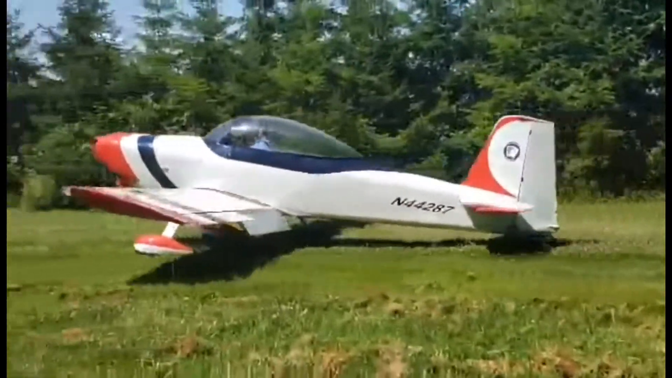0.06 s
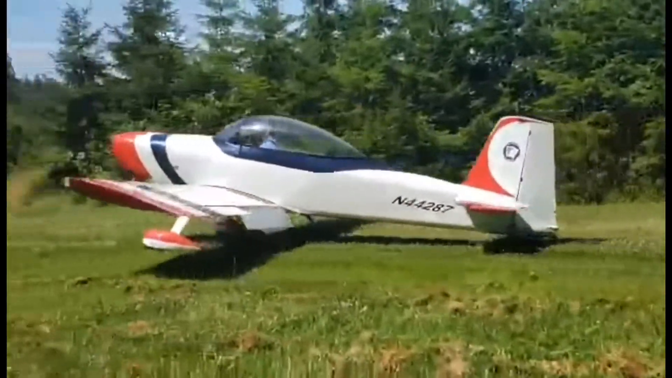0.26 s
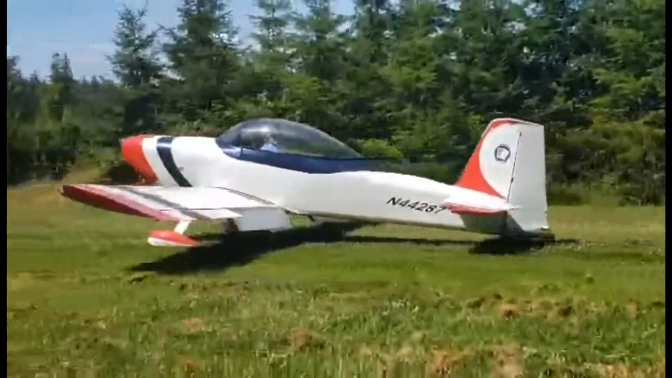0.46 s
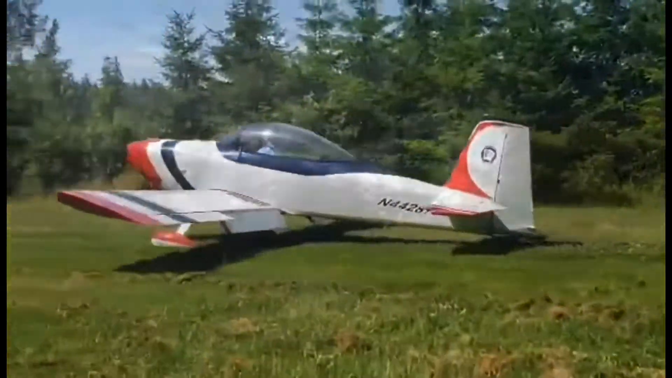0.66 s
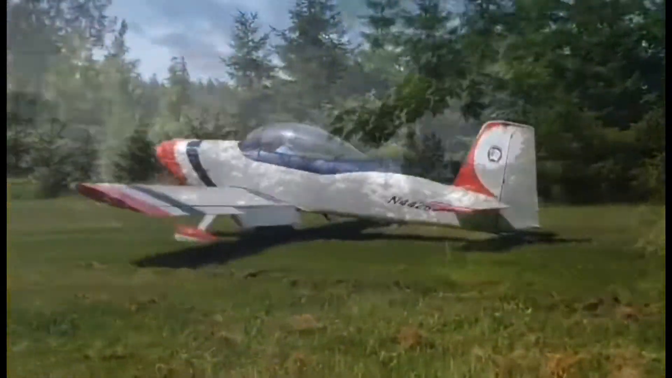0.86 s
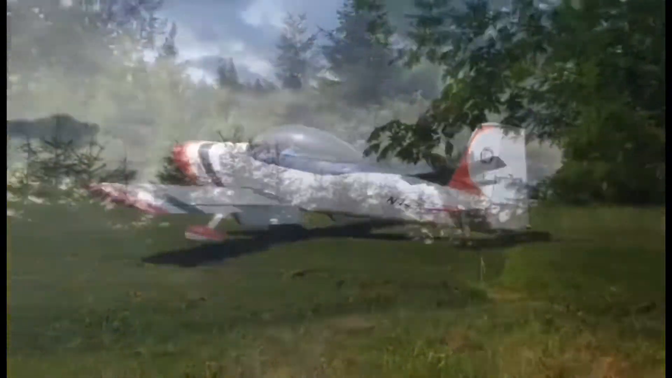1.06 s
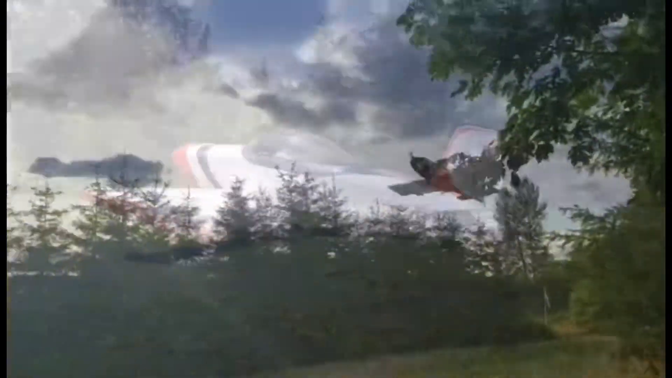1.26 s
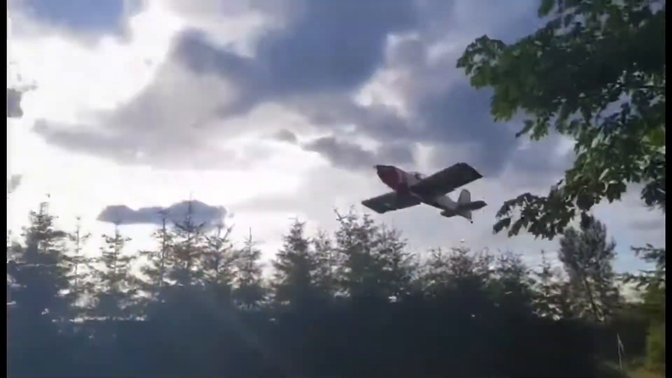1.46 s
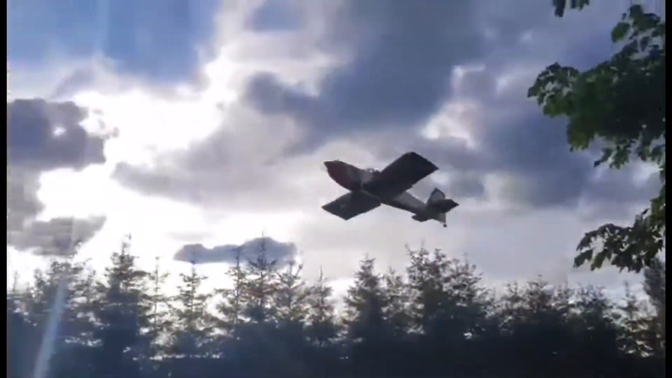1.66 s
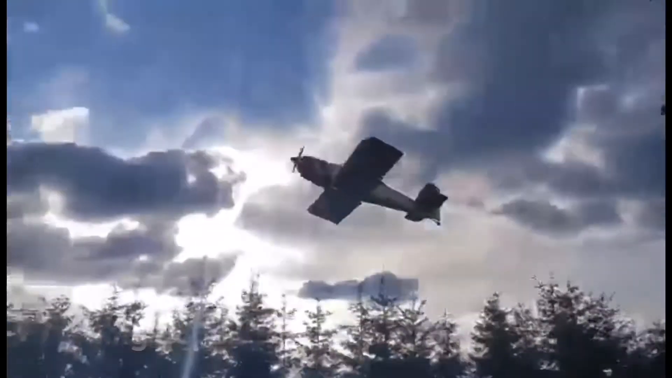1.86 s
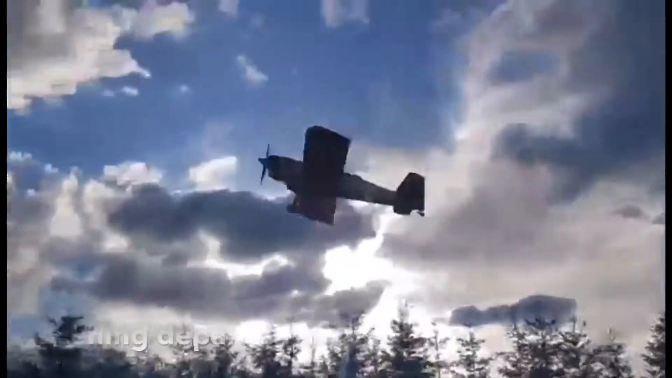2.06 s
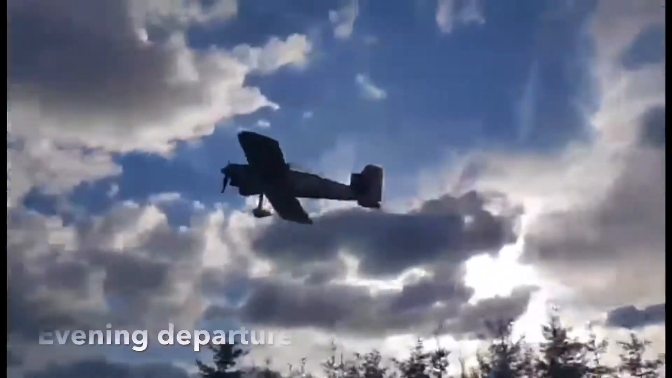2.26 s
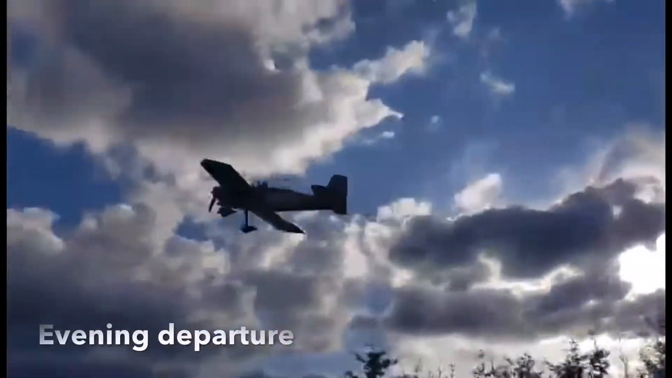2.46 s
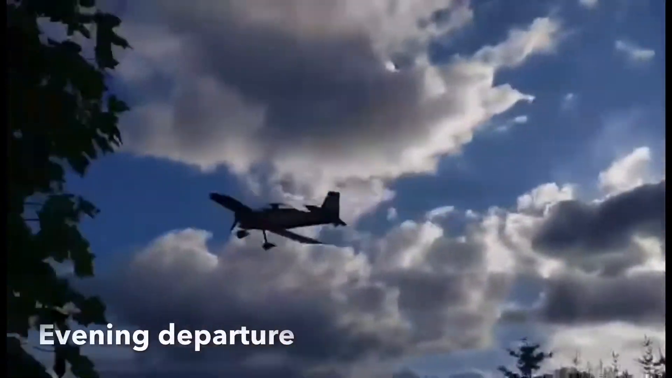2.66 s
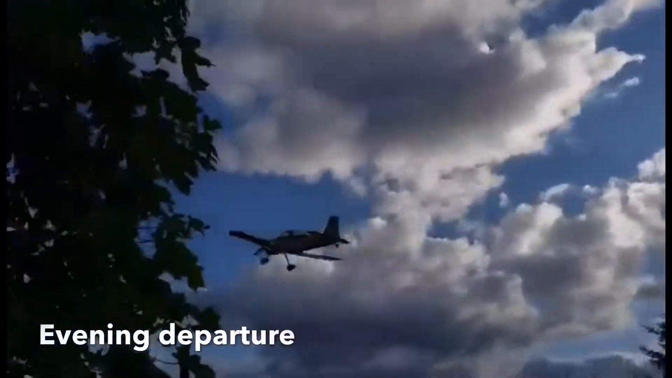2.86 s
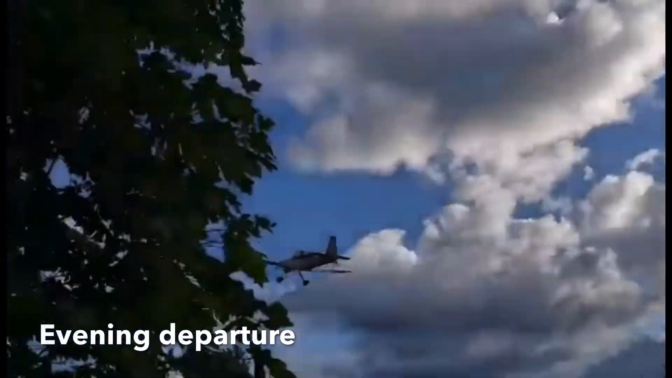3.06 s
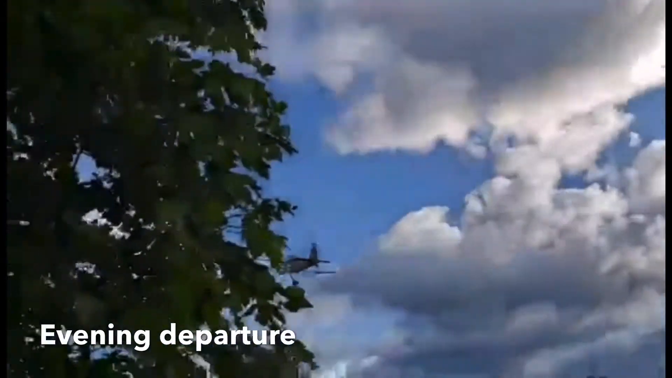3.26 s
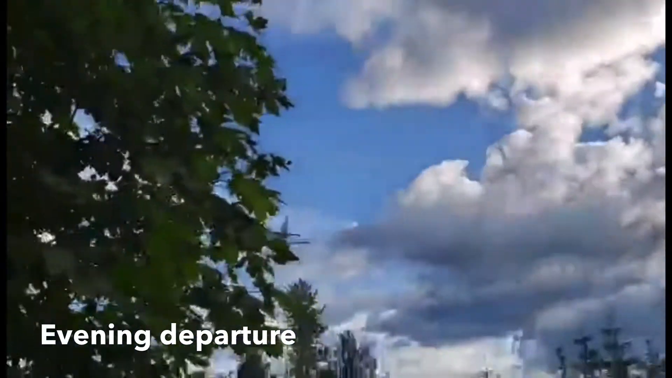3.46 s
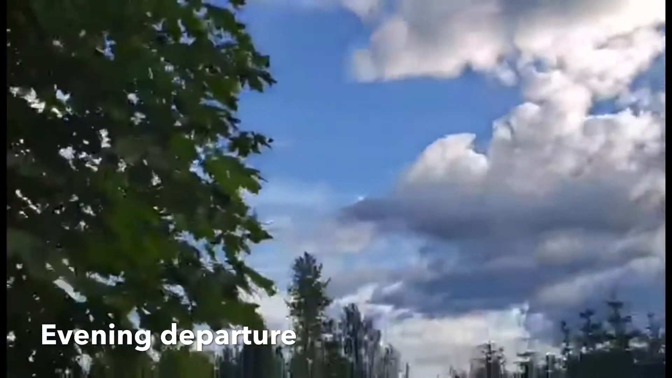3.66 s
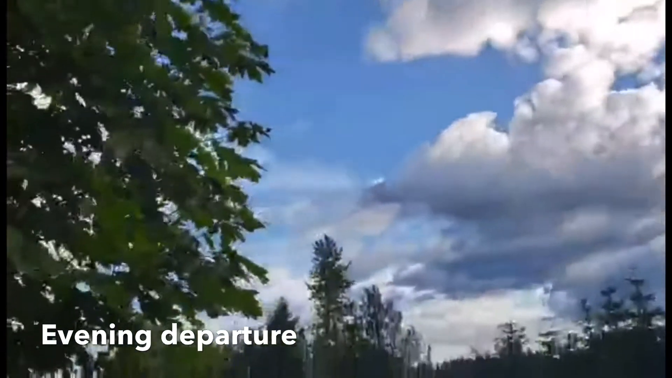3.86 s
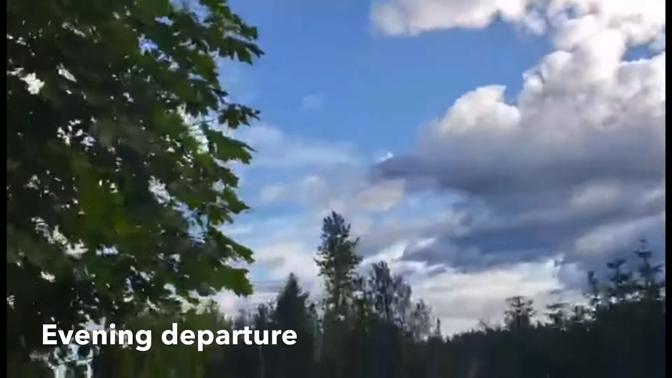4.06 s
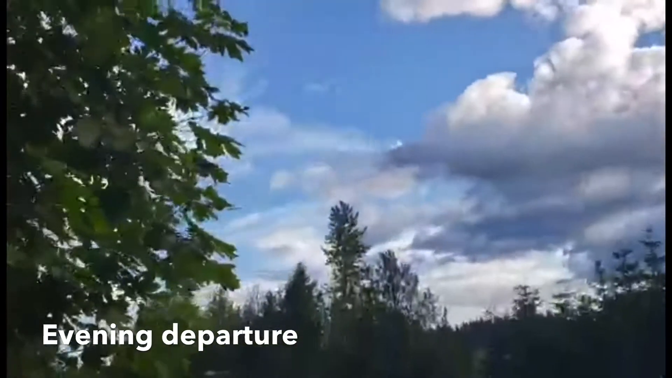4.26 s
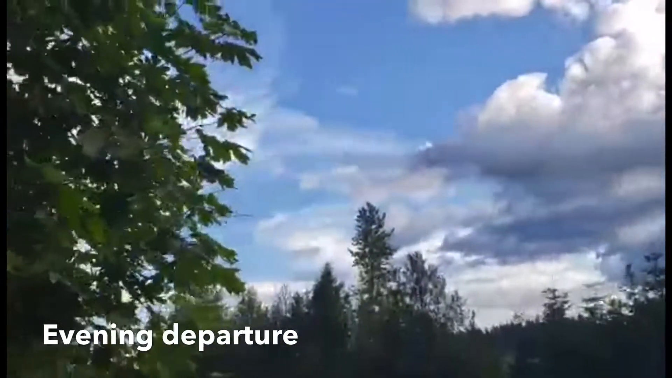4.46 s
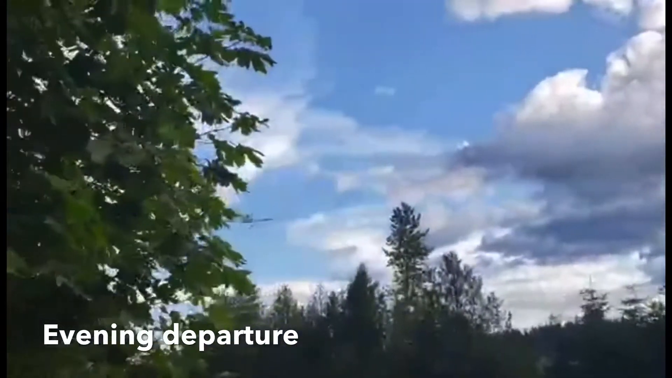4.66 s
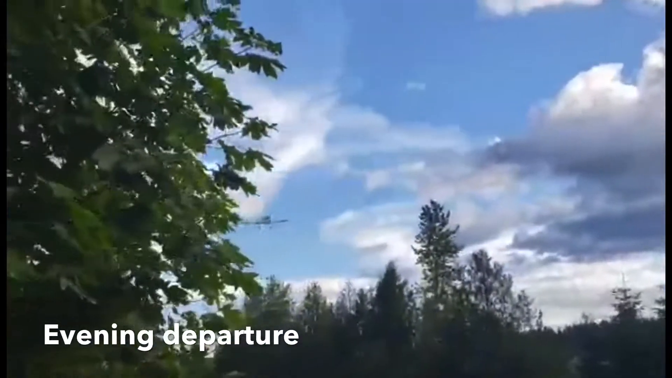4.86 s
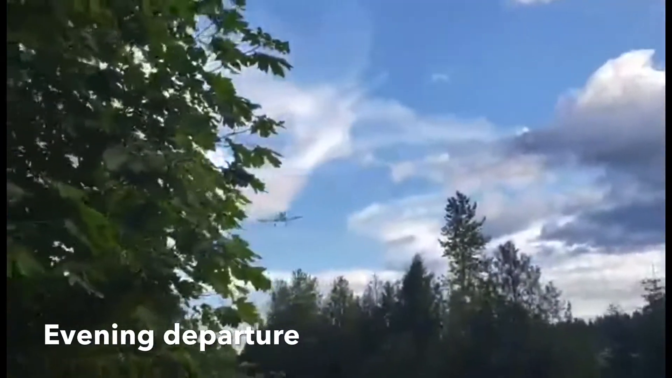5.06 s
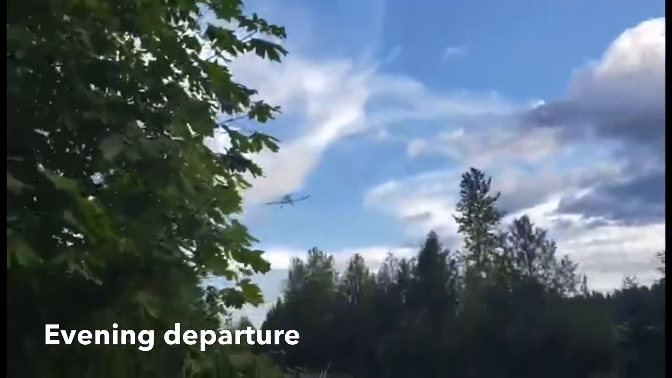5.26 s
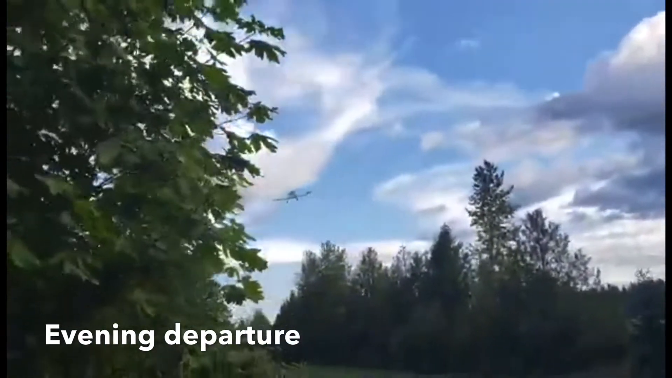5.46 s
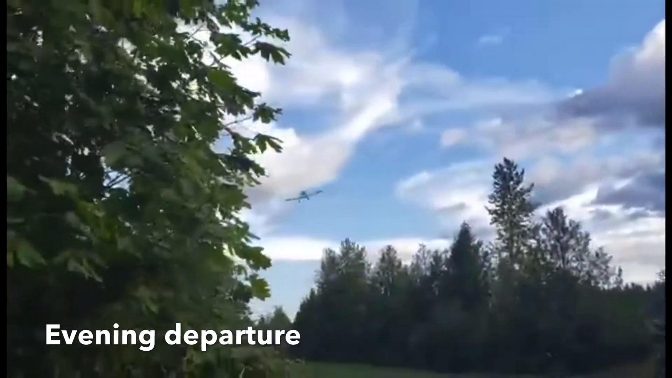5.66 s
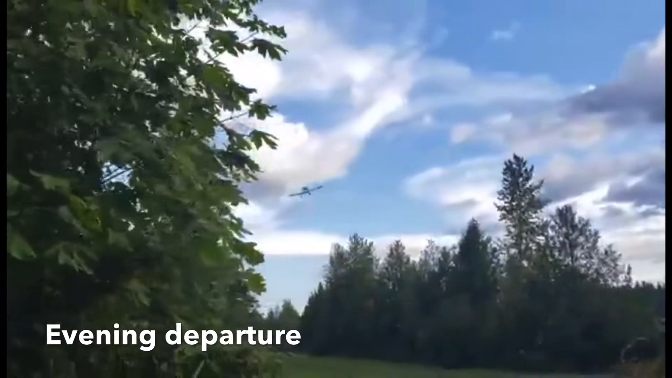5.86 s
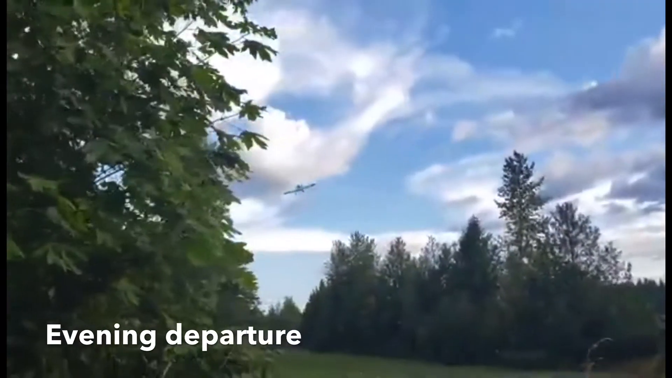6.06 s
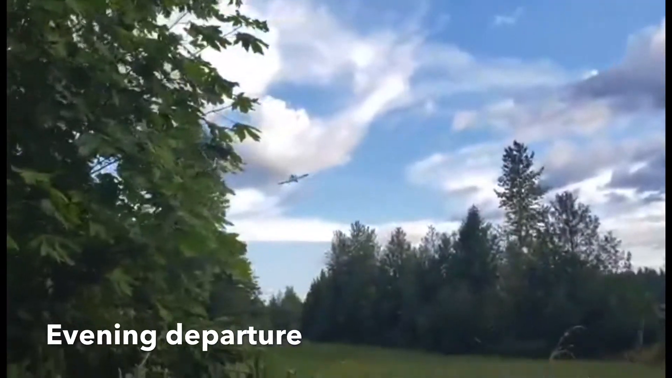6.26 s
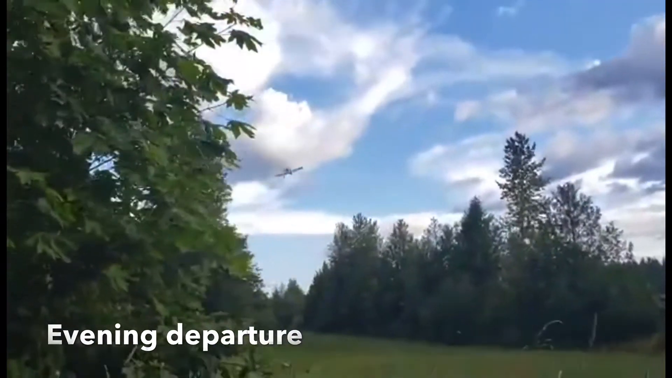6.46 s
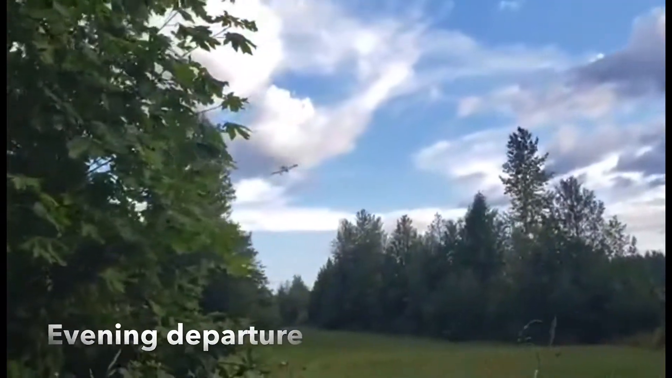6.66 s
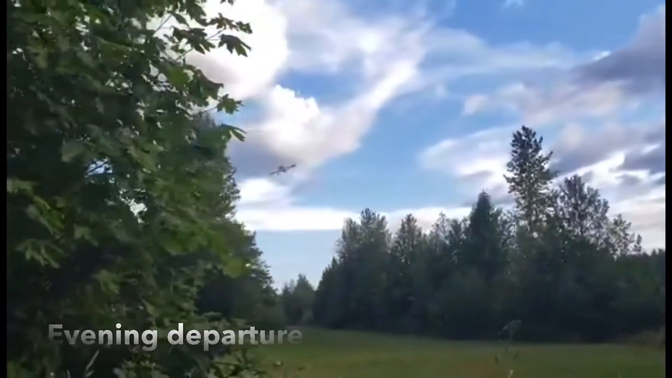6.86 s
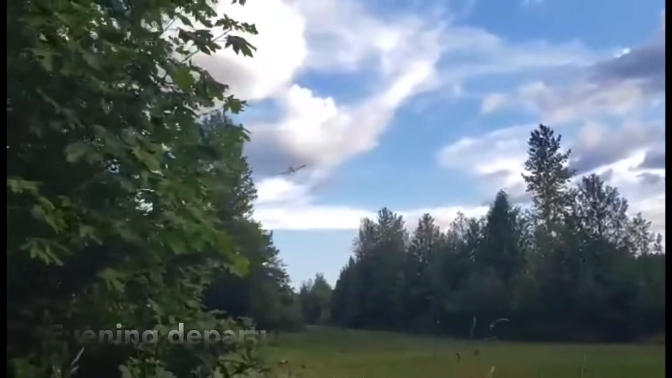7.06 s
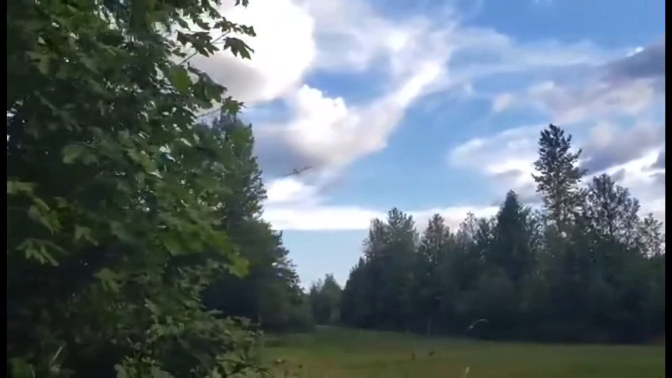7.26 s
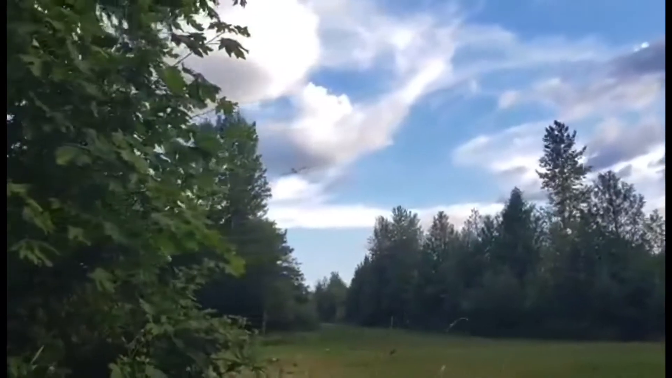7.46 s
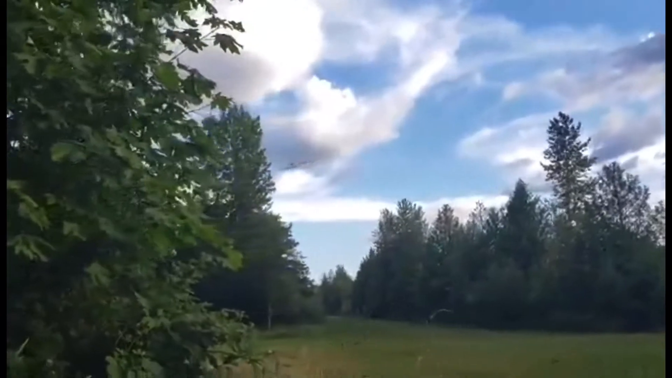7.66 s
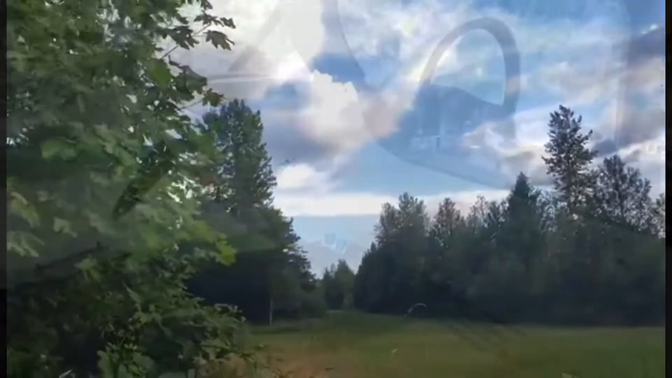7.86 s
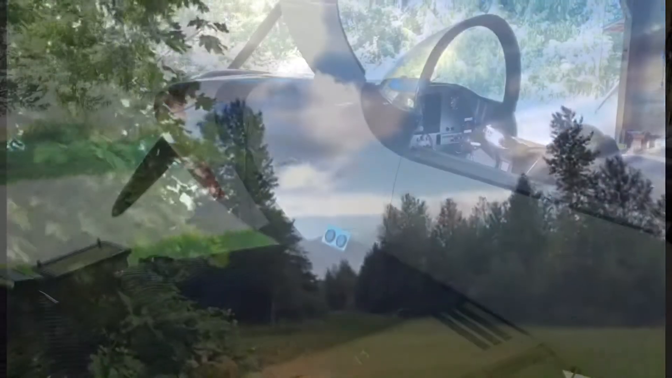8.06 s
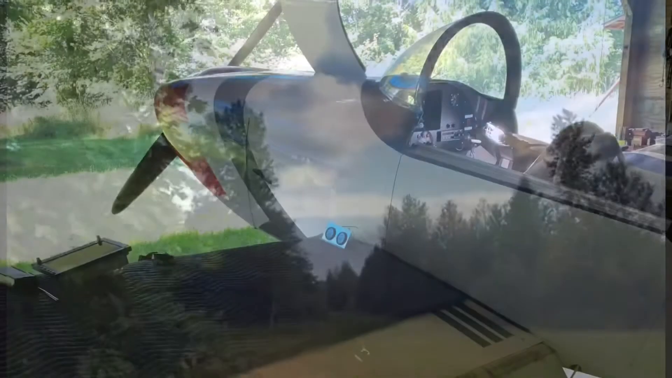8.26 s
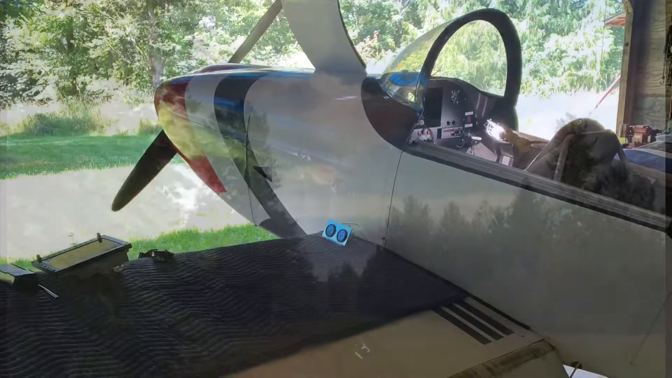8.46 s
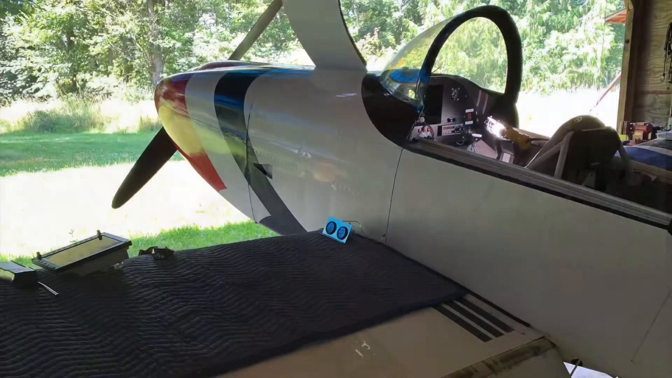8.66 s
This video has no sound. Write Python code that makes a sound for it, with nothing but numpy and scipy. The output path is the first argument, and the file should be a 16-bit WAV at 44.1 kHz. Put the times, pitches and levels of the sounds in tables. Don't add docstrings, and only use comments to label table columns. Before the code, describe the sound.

Low idling engine hum crossfades into a roaring light aircraft flyover that drops in pitch and fades into a distant, fluttering, raspy drone.

```python
import sys
import numpy as np
from scipy import signal
from scipy.io import wavfile
from scipy.ndimage import uniform_filter1d

SR = 44100
rng = np.random.default_rng(int(sys.argv[2]) if len(sys.argv) > 2 else 0)


def master_out(mix):
    frames = np.transpose(np.atleast_2d(mix))
    ceiling = np.clip(frames, -1, 1)
    pcm = np.round(ceiling * 32767).astype(np.int16)
    wavfile.write(sys.argv[1], SR, pcm)


def boost(x):
    u = np.asarray(x, float) / 20
    return 10 ** u


N = 384111

# (strength [level/dB], timing [firings])
CYLINDERS = [(-2.5, -.012), (-2, -.01), (1.5, .012), (2.5, .01)]
FAR_FROM_S = 3.34


def rms_one(x):
    return x / np.sqrt(np.mean(x ** 2) + 1e-20)


def in_time(rows):
    s, *columns = np.transpose(rows)
    return [np.interp(np.arange(N) / SR, s, c) for c in columns]


def by_view(rows, view):
    at, *columns = np.transpose(rows)
    return [np.interp(view, at, c) for c in columns]


def at_hz(points, hz):
    table_hz, values = np.transpose(points)
    return np.interp(np.log(hz), np.log(table_hz + 1), values)


def bandpass(x, order, edges_hz):
    return signal.sosfilt(signal.butter(order, edges_hz, "band", fs=SR, output="sos"), x)


def highpass(x, order, edge_hz):
    return signal.sosfilt(signal.butter(order, edge_hz, "high", fs=SR, output="sos"), x)


def drift(rate, size=N):
    r = np.exp(-80 * np.pi * rate / SR)
    steps = rng.standard_normal(size // 40 + 2002)
    slow = signal.lfilter([1], [1, -2 * r, r * r], steps)[2000:]
    return np.interp(np.arange(size) / 40, np.arange(len(slow)), rms_one(slow))


def resonances(x, modes):
    out = 0
    for k, (hz, width, level_db) in enumerate(modes):
        r = np.exp(-np.pi * width / SR)
        b = (1 - r * r) / 2 * np.array([1, 0, -1])
        a = [1, -2 * r * np.cos(2 * np.pi * hz / SR), r * r]
        out = out + (-1) ** k * boost(level_db) * signal.lfilter(b, a, x)
    return out


def burst(clicks, decay_ms):
    r = np.exp(-1000 / (decay_ms * SR))
    return signal.lfilter([(1 - r) * np.e], [1, -2 * r, r * r], clicks)


def banded_noise(colour, edges, gate, patchy_db, shift=None, soft_gate=None):
    # (f/Hz, likeness [0-1])
    likeness = [(60, .995), (130, .99), (280, .98), (610, 0.88), (1320, 0.62), (2870, 0.55), (6220, 0.25),
                (13500, 0.1)]
    # (f/Hz, left minus right [level/dB])
    left_db = [(60, -0.5), (110, 0.5), (200, 2), (360, 9), (670, 5), (1210, 2), (2220, 3), (4040, 0),
               (7380, 13.5), (13500, 1)]
    soft_above_hz = 4400
    size = len(gate)
    out, together = 0, drift(0.99, size)
    white = rng.standard_normal((2, 2, size)) * gate
    soft = white if soft_gate is None else white * soft_gate / gate
    for k, (low, high) in enumerate(zip(edges, edges[1:])):
        noise = soft if low > soft_above_hz else white
        mid, side = bandpass(noise[k % 2], 2, [low, high])
        hz = np.sqrt(low * high)
        alike = np.clip(at_hz(likeness, hz), 0, 1)
        level_db = at_hz(colour, hz) + patchy_db * (0.4 * together + drift(20, size))
        if shift:
            level_db = level_db + shift(hz)
        pan = boost(at_hz(left_db, hz) / 2 * np.array([[1], [-1]]))
        spread = np.sqrt(1 - alike) * side * [[1], [-1]]
        out = out + boost(level_db) * pan * (np.sqrt(1 + alike) * mid + spread)
    return out


def ground_echo(x, lag_ms, share, cut_hz):
    dull = signal.lfilter(*signal.butter(1, cut_hz, fs=SR), x)
    at = np.arange(N) - lag_ms * SR / 1000
    return x + share * np.array([np.interp(at, np.arange(N), c) for c in np.atleast_2d(dull)])


def grass():
    # (t/s, peak [level/dB])
    ticks_near = [
        (7.21, -48),
        (7.275, -42),
        (7.29, -48),
        (7.345, -48),
        (7.37, -45),
    ]
    start_s, length_s, chirr_db, strokes_per_s = 7.08, .19, -57, 90
    s = np.arange(N) / SR
    on = np.clip(np.minimum(s - start_s, start_s + length_s - s) / .03, 0, 1)
    on = on * (1 + .6 * np.sin(2 * np.pi * strokes_per_s * s))
    noise = rng.standard_normal((2, N))
    chirr = rms_one(bandpass(noise, 3, (10800, 12600)))
    tick_s, tick_db = np.transpose(ticks_near)
    clicks = np.zeros(N)
    clicks[(tick_s * SR).astype(int)] = boost(tick_db)
    ticks = highpass(burst(clicks, decay_ms=.6) * noise, 2, 7500)
    return boost(chirr_db) * on * chirr + ticks


def taxi():
    # (t/s, drone [level/dB], rush [level/dB])
    idle_levels = [
        (0, -9, -43),
        (.25, -10, -43.5),
        (.5, -12.5, -44),
        (.75, -17, -52),
        (1.0, -25, -81),
        (1.2, -14, -38),
        (1.45, -35, -99),
    ]
    # (multiple of the engine cycle, strength [level/dB])
    idle_orders = [(4, -63.5), (6, -65), (7, -49), (8, -20.5), (9, -53), (10, -50), (11, -64.5), (12, -30),
                   (13, -83.5), (15, -49), (16, -38.5), (17, -48), (19, -38.5), (20, -43), (23, -46.5),
                   (25, -38), (26, -80), (27, -47)]
    # (f/Hz, level/dB per Hz)
    idle_colour = [(25, -20), (70, 3), (150, -15), (231, -24), (325, -44), (402, -12), (538, -36),
                   (701, -26.5), (1290, -24), (1910, -29.5), (2700, -36.5), (3200, -36), (12200, -36),
                   (13900, -60)]
    cycle_hz = 8.68
    size = int(1.5 * SR)
    drone_db, rush_db = (c[:size] for c in in_time(idle_levels))
    turns = cycle_hz * (np.arange(size) / SR - .03)
    hum = sum(np.sqrt(2) * boost(db) * np.cos(2 * np.pi * k * turns) for k, db in idle_orders)
    four_puffs = 0.18 * np.cos(2 * np.pi * 4 * (turns - .05))
    gate = 1 + four_puffs + 0.035 * np.cos(2 * np.pi * turns)
    rush = rms_one(banded_noise(idle_colour, 27 * 2 ** np.arange(0, 9.1, .5), gate, patchy_db=.6))
    return np.pad(boost(drone_db) * hum + boost(rush_db + 5.5) * rush, ((0, 0), (0, N - size)))


def tree_returns(turns):
    # (t/s, pitch above the drone [f/Hz], level/dB)
    trees = [
        (1.7, -5.5, -38),
        (2.95, 5.5, -47),
        (3.85, 5, -48),
        (4.55, 6, -47),
        (5.3, 2.8, -43),
        (5.5, 6.5, -47),
        (6.3, 4, -43),
        (7, 7.5, -46),
        (7.45, 3.2, -45),
        (8.05, 5, -45),
    ]
    length_s, sag_hz_per_s = .38, 1.5
    s, out = np.arange(N) / SR, np.zeros(N)
    for at, hz, tree_db in trees:
        heard = np.abs(s - at) < 3 * length_s
        since = s[heard] - at
        lead = hz * since - sag_hz_per_s * since ** 2 / 2
        swell = boost(tree_db) * np.exp(-(since / length_s) ** 2)
        out[heard] += np.sqrt(2) * swell * np.cos(2 * np.pi * (turns[heard] + lead))
    return out


def rumble_below(low_db, view):
    # (f/Hz, level/dB per Hz)
    rumble_colour = [(20, -18), (40, -18), (70, -9), (120, -14), (220, -12), (330, -14)]
    rumble = banded_noise(rumble_colour, 20 * 2 ** np.arange(0, 4.1, 1.), np.ones(N), patchy_db=.6)
    return boost(low_db - 7.0 - 9.4 * view) * rms_one(rumble)


def drone(turns, firing_hz, view, level_db, lag_ms):
    sides = [0, .2, .5, .75, 1]
    orders_out = [
        (-6.5, -3, 10, -5.5, 2),
        (3, -2, 4, -7.5, -7.5),
        (-5.5, -13.5, 2.2, -16, -11.5),
    ]
    grass_shares = [.6, .88, .3]
    flutter_dbs = [.5, .5, .7]
    disc_view, disc_width, disc_db = 0.683, 0.1, 7
    level_db = level_db + disc_db * np.exp(-((view - disc_view) / disc_width) ** 2)
    out = 0
    for k, sides_db, share, flutter_db in zip(range(1, 4), orders_out, grass_shares, flutter_dbs):
        phase = 2 * np.pi * k * (turns - .14)
        late = 2 * np.pi * k * firing_hz * lag_ms / 1000
        both = np.cos(phase) + share * np.cos(phase - late)
        gain_db = level_db + np.interp(view, sides, sides_db) + flutter_db * drift(8.2)
        out = out - np.sqrt(2) * boost(gain_db) * both
    return out


def banks(turns, firing_hz):
    # (t/s, a quarter above each order [level/dB], three quarters above [level/dB],
    # on the order [level/dB], upper pipe tone [f/Hz], lower pipe tone [f/Hz], lower tone [level/dB],
    # width [f/Hz], fourth order [level/dB])
    bank_notes = [(.6, -54, -57, -60, 600, 430, -3, 250, -62), (.9, -43, -44, -50, 520, 420, -2, 130, -55),
                  (1.2, -36, -42, -42, 570, 400, -1, 130, -39),
                  (1.5, -33, -40, -42, 670, 350, -1, 110, -32),
                  (1.83, -38, -41, -43, 660, 410, -1, 110, -32),
                  (1.95, -37, -40, -42, 580, 400, -1, 80, -48), (2.1, -35, -39, -42, 530, 395, -2, 45, -53),
                  (2.4, -33, -35, -39, 525, 330, -1, 70, -42), (2.7, -36, -41, -41, 530, 365, -1, 65, -52),
                  (3, -43, -43, -43, 570, 380, -1, 90, -50), (3.3, -45, -46, -47, 550, 400, -4, 90, -47),
                  (3.6, -45, -47, -55, 520, 300, -5, 70, -45), (3.9, -50, -49, -54, 520, 300, -6, 60, -46),
                  (4.3, -54, -51, -57, 560, 300, -5, 50, -50), (5, -59, -59, -60, 580, 300, -6, 60, -51),
                  (5.5, -58, -59, -57, 590, 320, -4, 60, -45), (6.5, -57, -53, -53, 600, 350, 0, 50, -45),
                  (7, -61, -55, -55, 610, 350, 0, 50, -50), (7.5, -60, -56, -59, 600, 340, -2, 50, -45),
                  (8, -62, -60, -60, 590, 340, -2, 60, -54), (8.7, -85, -85, -85, 590, 340, -2, 60, -80)]
    *series_db, upper_hz, lower_hz, lower_db, width, fourth_db = in_time(bank_notes)
    flutter_db = np.interp(np.arange(N) / SR, [FAR_FROM_S, FAR_FROM_S + 2], [2.5, 3.5])
    turns = turns - .03
    out = boost(fourth_db + flutter_db * drift(5)) * np.cos(2 * np.pi * 4 * turns)
    for first, wave, level_db in zip([4.25, 4.75, 5], [np.sin, np.cos, np.sin], series_db):
        for k in np.arange(first, 11.5):
            low = 1 / np.hypot(1, 1.5 * (k * firing_hz - lower_hz) / width)
            high = 1 / np.hypot(1, 1.5 * (k * firing_hz - upper_hz) / width)
            gain = boost(level_db + flutter_db * drift(4)) * np.maximum(boost(lower_db) * low, high)
            out = out + gain * wave(2 * np.pi * k * turns + .12 * flutter_db * drift(4))
    return np.sqrt(2) * out


def firings(turns, facing_db, rough_db):
    # (t/s, cylinder [number, running on])
    facing_stack = [(.9, 2.6), (1.3, 2.7), (2.1, 3.6), (2.5, 2.2), (2.9, 2.7), (3.7, 2.8), (4.1, 2.1),
                    (5.3, 1.3), (6.5, -.5), (7.7, -.6), (8.2, -1.2)]
    # (t/s, extra level/dB)
    pops = [(2.316, 2), (2.383, 0), (2.455, 3), (2.494, 2), (2.578, 4), (2.606, 4.5), (2.62, 3), (2.635, 3),
            (2.717, 4), (2.746, 3), (2.76, 3), (2.774, 4), (2.816, 3), (2.886, 2.5), (2.93, 3), (2.942, 3),
            (2.999, 5), (3.056, 7), (3.113, 2.5), (3.172, 3), (3.227, 3), (3.283, 3), (3.398, 9.5),
            (3.513, 3), (5.055, 3), (5.07, 6), (5.635, 3), (5.65, 6), (6.17, 4), (6.2, 3), (6.518, 4),
            (6.59, 3), (6.62, 3), (6.633, 4), (6.677, 3), (6.691, 5), (6.792, 3), (7.369, 7), (7.442, 2.5),
            (7.499, 2), (8.003, 3), (8.295, 4), (8.31, 4), (8.352, 1.5), (8.366, 3)]
    count = np.arange(1, int(turns[-1]))
    strength_db, timing = np.array(CYLINDERS)[count % 4].T
    at = np.searchsorted(turns, count + timing)
    facing = facing_db * np.cos(np.pi / 2 * (count - in_time(facing_stack)[0][at]))
    for s, extra_db in pops:
        facing[np.argmin(np.abs(at - s * SR))] += extra_db
    uneven, even, rough = np.zeros((3, N))
    uneven[at] = boost(strength_db)
    even[np.searchsorted(turns, count)] = np.mean(boost(strength_db))
    rough[at] = boost(facing + rough_db * rng.standard_normal(len(count)))
    return uneven - even, rough


def stacks(turns, view):
    paired, stagger, tail_view = 2.8, -.0345, .3
    count = np.arange(1, int(turns[-1]) - 1)
    strength_db, timing = np.array(CYLINDERS)[count % 4].T
    ahead = np.clip(view[np.searchsorted(turns, count)] / tail_view, 0, 1)
    late = (1 - ahead) * paired * timing + ahead * stagger * (count % 4 - 1.5)
    out = np.zeros(N)
    out[np.searchsorted(turns, count + late)] = boost(strength_db * (1 - .4 * ahead))
    return out


def pipe_pulses(turns, view, pulse_db, low_db, unevenness):
    # (f/Hz, width [f/Hz], level/dB)
    pipe = [(365, 50, 3), (536.6, 73, 5), (615, 60, 5), (760, 200, -12)]
    staggered = stacks(turns, view)
    piped = 0
    for k, mode in enumerate(pipe):
        piped = piped + (-1) ** k * boost(3 * drift(3)) * resonances(staggered, [mode])
    pulses = -boost(pulse_db + low_db - 9) * rms_one(highpass(piped, 4, 330))
    lope = bandpass(unevenness, 2, [150, 310])
    return pulses - boost(low_db - 12.5 - 15 * view) * rms_one(lope)


def pipe_ring(rough, view, ring_db):
    # (f/Hz, width [f/Hz], level/dB)
    far_ring = [(1400, 160, 2), (1790, 160, 0), (2770, 170, -10), (3410, 200, -8), (3900, 300, -8)]
    # (f/Hz, width [f/Hz], level/dB)
    near_ring = [(1020, 220, 2.5), (1555, 110, 6.5), (2095, 360, -2.5), (2700, 300, 1), (3430, 190, -0.5),
                 (4070, 930, -2.5)]
    crack, near_view = 11, .07
    gas = burst(rough, decay_ms=2.27) * rng.standard_normal((2, N)) - crack * rough
    close = np.clip(view / near_view, 0, 1)
    ring = sum(resonances((1 - close) * gas + 1e-18, [mode]) for mode in far_ring)
    ring = ring + resonances(close * gas + 1e-18, near_ring)
    return boost(ring_db) * rms_one(ring[0] + .3 * ring[1] * [[1], [-1]])


def gas_rush(rough, bark_db, view, low_db, mid_db, high_db, presence_db, rasp_db, bright_db):
    # (f/Hz, level/dB per Hz)
    rush_colour = [(200, -30.5), (330, -14.5), (550, -5), (640, -6.5), (720, -19), (850, -3), (1150, -9),
                   (1600, -5.5), (2500, -4), (4500, -6.5), (7500, -10.5), (8300, -18), (12600, -16),
                   (14000, -27)]
    # (f/Hz, width [f/Hz], level/dB)
    body = [(2110, 240, -1), (2670, 260, -1), (4140, 240, -2), (5140, 200, 0), (7300, 900, 1),
            (11600, 500, -3)]
    soft_db = np.interp(np.arange(N) / SR, [FAR_FROM_S + .3, FAR_FROM_S + .8], [-2, -8])
    gate = 1 + boost([bark_db, bark_db + soft_db]) * burst(rough, decay_ms=1.5)
    gate, soft_gate = gate / np.sqrt(uniform_filter1d(gate ** 2, size=2600))
    high_db = high_db - high_db.mean()
    low_part = low_db - low_db.mean() - 4 * np.sin(np.pi * np.clip(view, 0, 1))
    parts = np.array([low_part, mid_db - mid_db.mean(), presence_db, 0.45 * high_db + rasp_db,
                      0.76 * high_db, high_db, 1.45 * high_db + bright_db])
    parts_hz = [550, 1400, 2600, 3800, 6500, 9000, 12500]

    def shift(hz):
        shares = [np.interp(np.log(hz), np.log(parts_hz), row) for row in np.eye(len(parts))]
        return shares @ parts

    rush = banded_noise(rush_colour, 220 * 2 ** np.arange(0, 6.1, 1 / 3), gate, patchy_db=1.5,
                        shift=shift, soft_gate=soft_gate)
    return rms_one(rush + .45 * sum(resonances(rush, [peak]) for peak in body))


def climb():
    # (t/s, f/Hz)
    firing = [(.4, 82.8), (1, 81.9), (1.3, 81.2), (1.6, 79.9), (1.8, 78.4), (2, 76.6), (2.2, 74.7),
              (2.4, 73), (2.6, 71.9), (2.8, 71), (3, 70.5), (3.4, 69.8), (4, 69.3), (5, 69.15),
              (6.5, 69.15), (7, 69.3), (8.7, 69.3)]
    # (t/s, level/dB)
    loudness = [(.45, -58), (.58, -42.5), (.9, -30), (1.15, -28), (1.5, -22), (2.05, -25.5), (2.45, -23),
                (3.05, -23), (3.3, -27.5), (3.6, -31.5), (4.2, -36), (5, -34), (6, -32), (7, -31),
                (7.9, -34), (8.4, -43), (8.6, -56), (8.7, -110)]
    # (t/s, delay [ms])
    ground = [(.75, 1.6), (1.3, 2.0), (1.6, 3.2), (2.1, 5.1), (2.4, 6.3), (2.75, 4.2), (3.3, 3.9),
              (4.7, 3.9), (5.3, 3.62), (6, 3.4), (8.7, 3.2)]
    # (view [0-1], bark over rush [level/dB], pipe pulse [level/dB], pipe ring [level/dB])
    exhaust = [(0, -1.5, -12, -20), (.03, 2, -9, -14), (.1, 6, -13, -14), (.15, 7, -15, -8),
               (.25, 5, -16, -7), (.45, 1, -19, -14), (.65, 2, -19, -18), (.85, -4, -18, -14),
               (1, -7, -14, -16)]
    # (view [0-1], lows [level/dB], middles [level/dB], highs [level/dB])
    balance = [(0, -8.5, -7.5, -10.5), (.03, -8, -3, -10), (.12, -13.5, -3, -3), (.35, 0.5, -1, 1.5),
               (.65, 3.5, -2.5, 2.5), (.85, 2, -0.5, -2), (.95, -2, -4, -4.5), (1, 5.5, 1.5, -5.5)]
    # (t/s, level/dB, rasp [level/dB], highs [level/dB], presence [level/dB])
    swells = [(1.46, -1, 2.5, 1.5, 2.5), (1.71, 0, 0, -3, 0), (2.19, 0, 1, 0, -0.5), (2.93, 0.5, -2, -3, 3),
              (2.68, 0.5, -3.5, 1.5, 3.5), (3.17, 0, 0.5, 1, 2), (4.73, 2.5, -3, -3.5, -3),
              (5.08, 0, 3, 0, -2.5), (5.65, 0, 4.5, 2, -1.5), (6.22, -1.5, 7.5, 3, 1),
              (6.539, 1.5, 3, 1.5, -2), (6.66, -1, 9, -7.5, 2.5), (6.84, 1.5, 4.5, -10, -4),
              (7.0, -0.5, -1, -9, -1), (7.22, 1, -3, -4, -3.5), (7.45, -2, 1.5, -8.5, -0.5),
              (7.65, 0.5, 1, -4, -2.5), (7.8, 1, 2.5, -8, -1.5), (7.9, 0.5, -1.5, -1, -2),
              (8.02, 1, 4.5, -4, -0.5), (8.16, 1, -1.5, -6.5, -0.5), (8.33, -2, 11.5, -3, 2)]
    # (t/s, length [s], ring gain [level/dB])
    gaps = [
        (3.45, .65, 5),
        (3.97, .75, -7),
        (6.45, .55, 10),
        (6.85, 1.0, 11),
        (7.3, .4, 4),
        (7.95, .5, 10),
        (8.28, .6, 13),
    ]
    receding_hz, nearing_hz = 69.2, 82.8
    swell_s, gap_open_s, gap_close_s = .08, .06, .25
    s = np.arange(N) / SR
    (level_db,), (lag_ms,), (firing_hz,) = in_time(loudness), in_time(ground), in_time(firing)
    view = (firing_hz - receding_hz) / (nearing_hz - receding_hz)
    bark_db, pulse_db, ring_db = by_view(exhaust, view)
    low_db, mid_db, high_db = by_view(balance, view)
    bumps = np.array([np.exp(-((s - at) / swell_s) ** 2) for at, *_ in swells])
    swell_db, rasp_db, bright_db, presence_db = np.array(swells)[:, 1:].T @ bumps
    gap_db = 0
    for at, length, db in gaps:
        opening = np.minimum((s - at) / gap_open_s, (at + length - s) / gap_close_s)
        gap_db = gap_db + db * np.clip(opening, 0, 1)
    low_db = low_db - swell_db
    mid_db = mid_db - swell_db + .15 * gap_db + 0.25 * np.minimum(gap_db, 0)
    ring_db = ring_db + gap_db
    high_db = high_db - 2 * np.maximum(s - FAR_FROM_S, 0)

    turns = np.cumsum(firing_hz) / SR - .29
    tones = drone(turns, firing_hz, view, level_db, lag_ms) + tree_returns(turns) + banks(turns, firing_hz)
    unevenness, rough = firings(turns + .04 + .1 * view, facing_db=2.0, rough_db=1.4)
    pulses = pipe_pulses(turns, view, pulse_db, low_db, unevenness)
    rush = gas_rush(rough, bark_db, view, low_db, mid_db, high_db, presence_db, rasp_db, bright_db)
    ring = pipe_ring(rough, view, ring_db)
    near = ground_echo(pulses, lag_ms, share=1.0, cut_hz=160)
    near = near + ground_echo(rush + ring, lag_ms, share=0.059, cut_hz=4500)
    sway = boost((.35 + .45 * drift(2.5)) * [[1], [-1]])
    fade_in = np.clip((s - .42) / 0.2, 0, 1)
    blast = boost(level_db + swell_db + 3.0) * (near + rumble_below(low_db, view))
    return fade_in * (tones * sway + blast)


def scene():
    # (t/s, left behind right [samples])
    bearing = [
        (0, -5),
        (.45, -5),
        (.6, 5),
        (1.5, 5),
        (1.8, 1),
        (2.2, -1),
        (4, 0),
        (8.7, -1),
    ]
    left, right = grass() + taxi() + climb()
    left = np.interp(np.arange(N) - in_time(bearing)[0], np.arange(N), left)
    return np.array([left, right]) * np.clip((8.662 - np.arange(N) / SR) / 0.015, 0, 1)


def thin_out(x, hole_db, spread_db, ragged_hz):
    top_hz, far_loss_hz = 13050, 300
    mid_side = np.array([x[0] + x[1], x[0] - x[1]]) / 2
    hz, s, bins = signal.stft(mid_side, SR, window="cosine", nperseg=2048)
    power = np.abs(bins) ** 2
    band = np.arange(len(hz)) // 14
    masking = uniform_filter1d(power.sum(axis=0), size=65, axis=0)
    chance = rng.standard_normal((2, band[-1] + 1, len(s)))
    chance = uniform_filter1d(chance, size=2) * np.sqrt(2)
    step_db = hole_db + spread_db * chance[:, band] + 4.5 * (hz > 8000)[:, None]
    kept = (power > masking * boost(step_db) ** 2) | (hz < 2000)[:, None]
    dips = uniform_filter1d(np.minimum(rng.exponential(1, len(s)) ** 2, 9), size=3)
    top = top_hz - ragged_hz * dips * (s > .6) - far_loss_hz * (s > 3.45)
    bins = bins * kept * (hz[:, None] < top)
    mid, side = signal.istft(bins, SR, window="cosine", nperseg=2048)[1][:, :N]
    return np.array([mid + side, mid - side])


def low_pass(x):
    return signal.sosfilt(signal.butter(12, 14070, fs=SR, output="sos"), x)


def record(dry):
    rounded = .92 * np.tanh(dry / .92)
    mix = thin_out(rounded, hole_db=-9, spread_db=6, ragged_hz=300)
    return low_pass(mix)


dry = scene()
out = record(dry)
master_out(out)
```